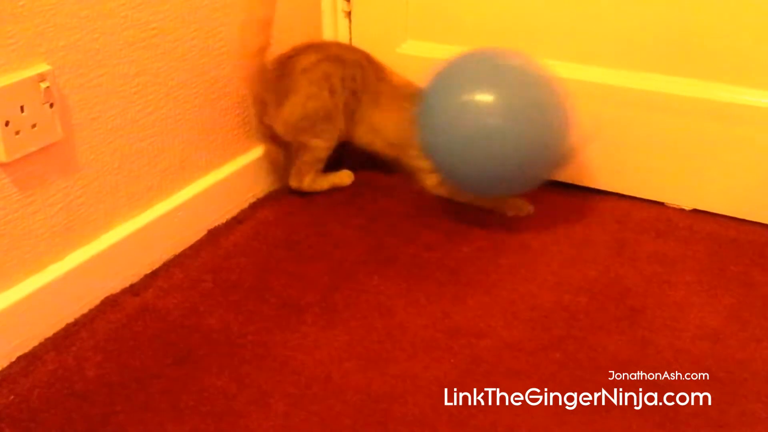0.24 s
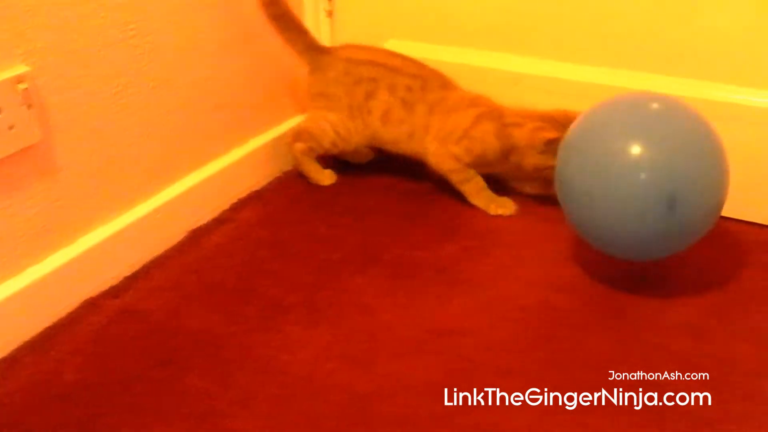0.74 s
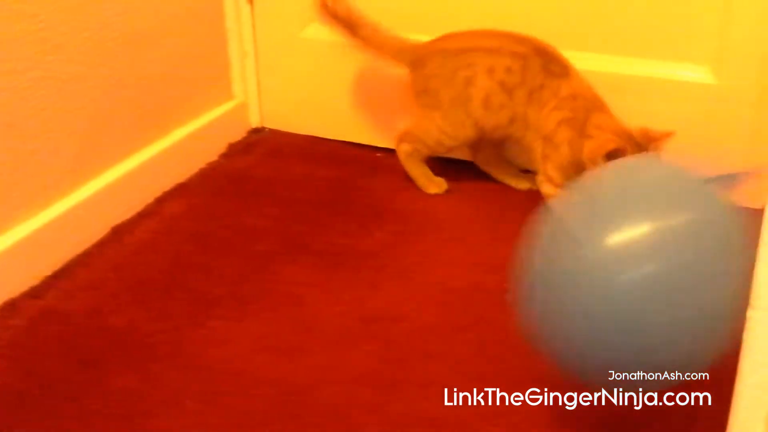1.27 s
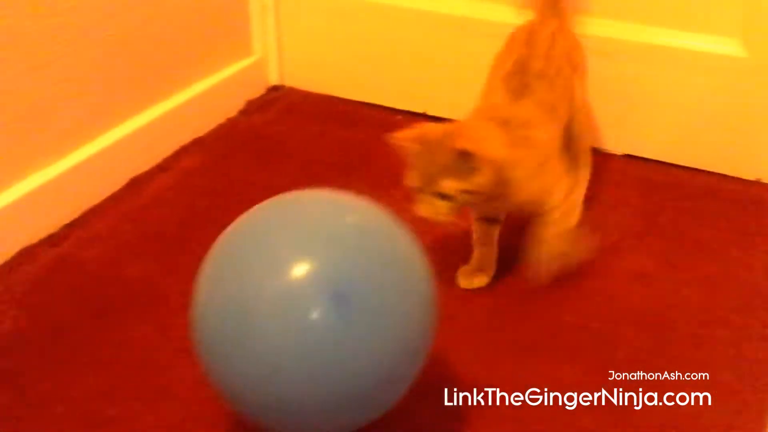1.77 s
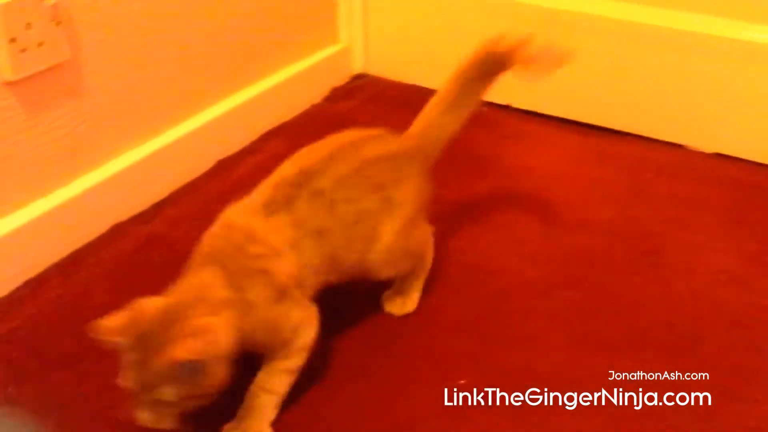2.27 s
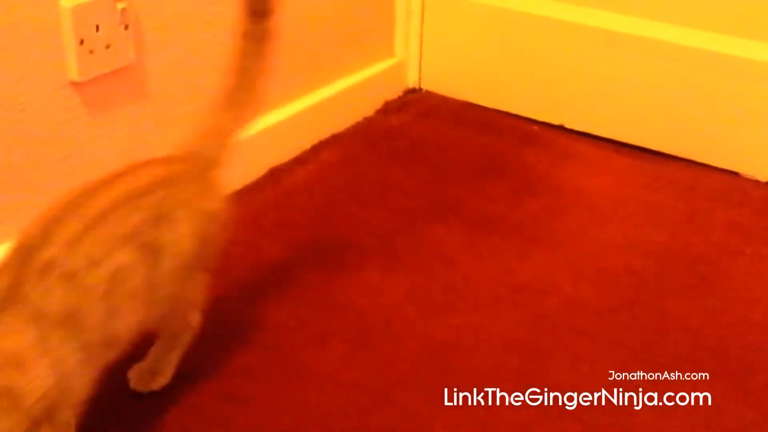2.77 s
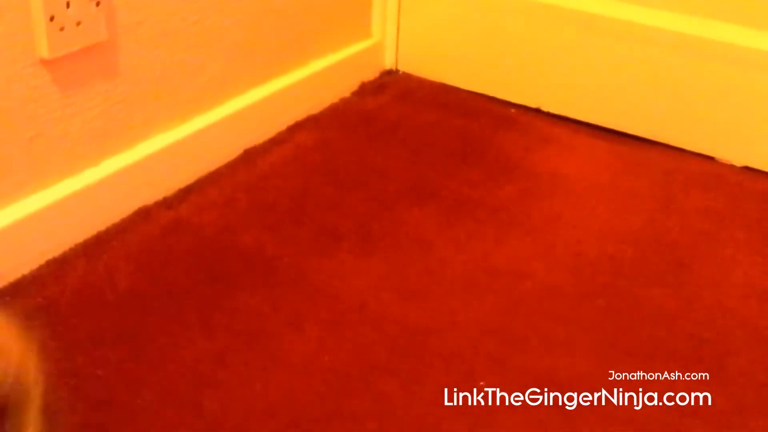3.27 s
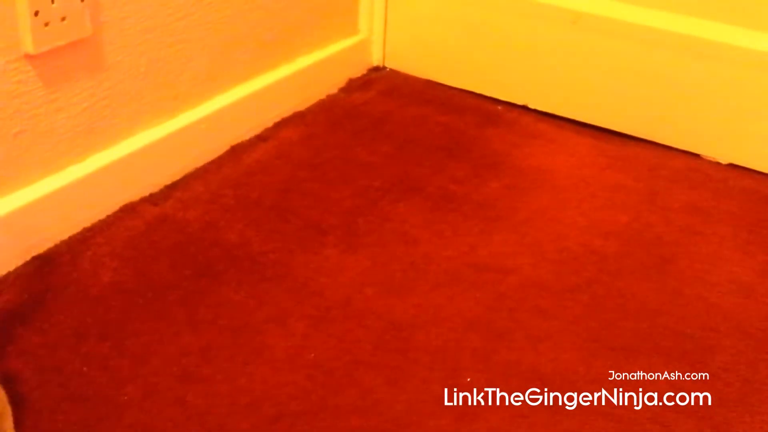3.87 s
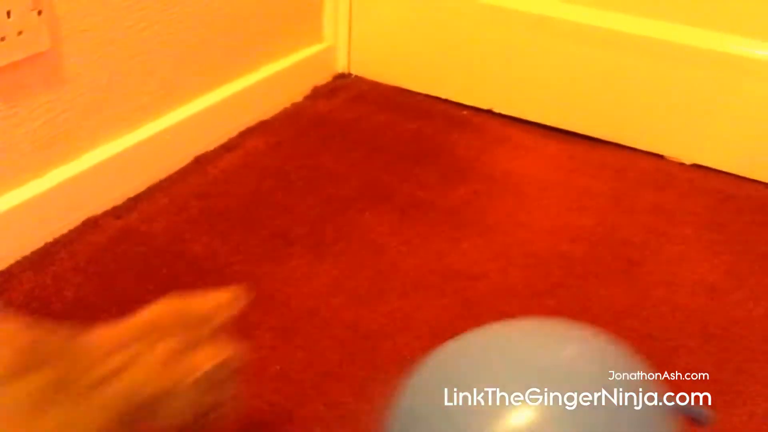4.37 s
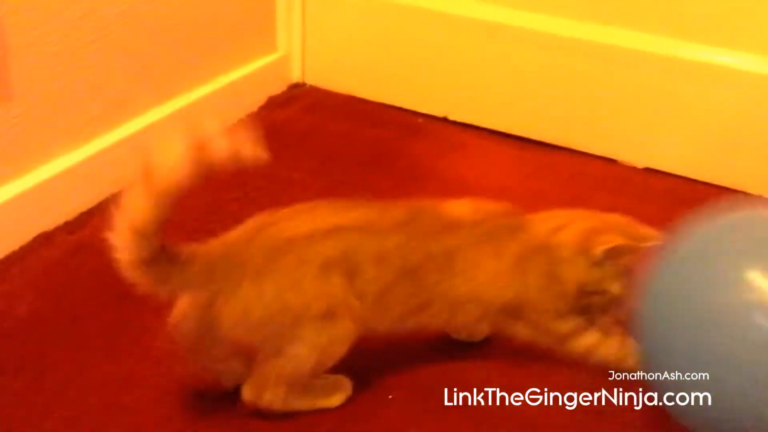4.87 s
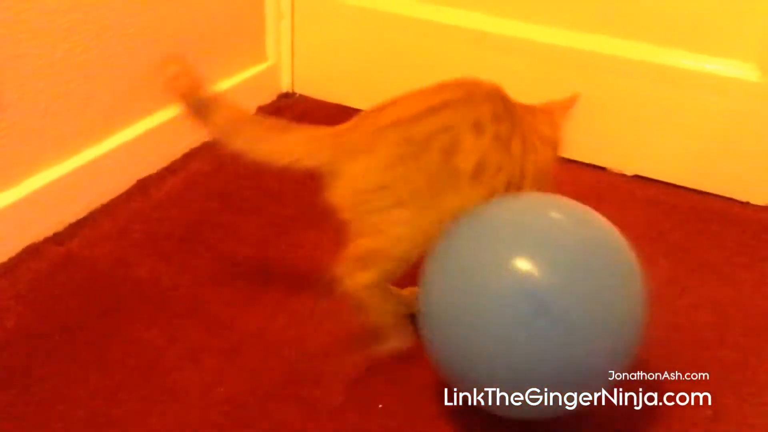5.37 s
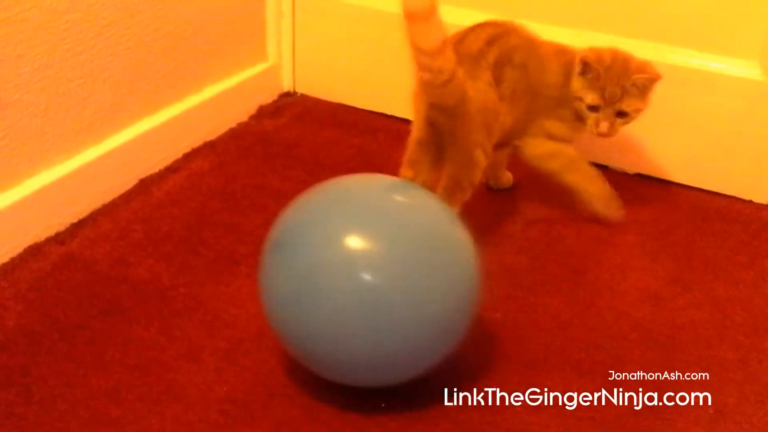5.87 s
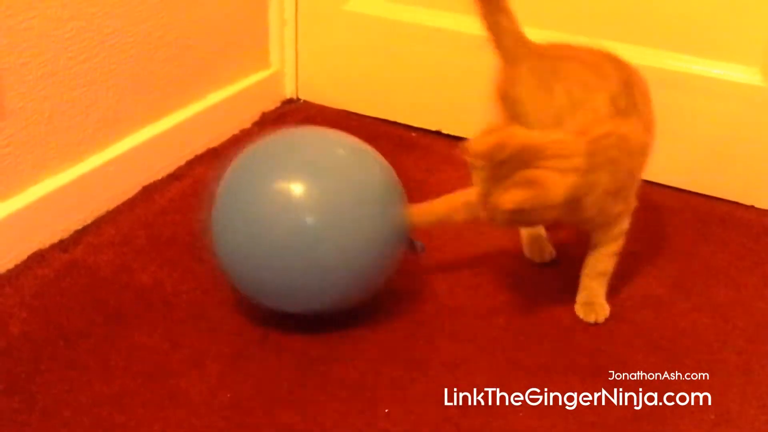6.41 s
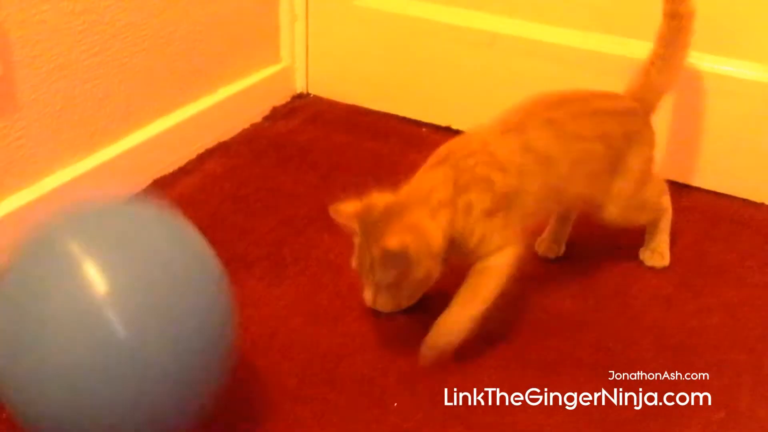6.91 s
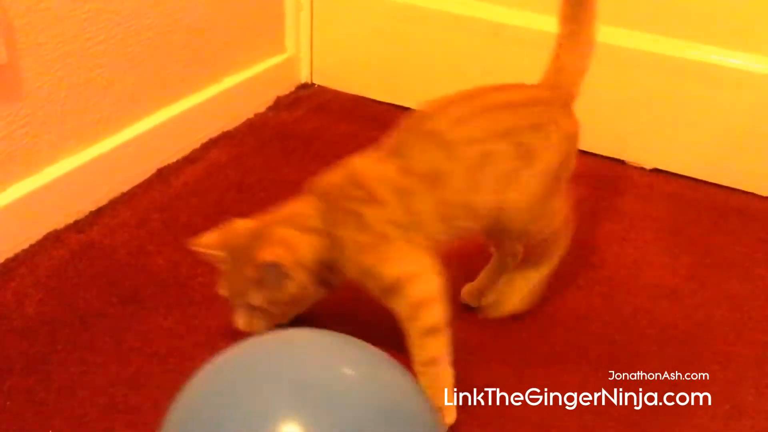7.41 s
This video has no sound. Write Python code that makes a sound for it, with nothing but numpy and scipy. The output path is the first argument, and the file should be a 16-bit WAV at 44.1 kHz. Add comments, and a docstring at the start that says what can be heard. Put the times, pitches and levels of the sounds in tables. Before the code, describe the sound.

Dull hollow balloon thumps in uneven bursts, with claw ticks, fur scuffs and rubbery drumming drags, close up in a small carpeted room.

```python
"""A small carpeted room, where a kitten chases a balloon close to a mono camera microphone.
Blows and bounces are damped thumps that excite the balloon's modes; claws and fur scuff as a tick and
grainy filtered noise; drags drum the balloon with random stick-slip taps and hiss; one slip squeaks.
The room answers with decaying noise by band, over a quiet floor of drifting noise and faint hum."""
import sys
import numpy as np
from scipy import signal
from scipy.fft import rfft, irfft, next_fast_len
from scipy.io import wavfile
from scipy.ndimage import uniform_filter1d

SR = 44100
rng = np.random.default_rng(int(sys.argv[2]) if len(sys.argv) > 2 else 0)


def master(y):
    """Save y as 16-bit WAV."""
    cut = np.clip(np.atleast_2d(y).T, -1, 1)
    pcm = np.round(cut * 32767)  # scale
    wavfile.write(sys.argv[1], SR, pcm.astype(np.int16))


N = 337365  # length in samples
GRIT_HZ, GRIT_DB = 900, 3.5  # grains of fibre hiss [1/s] and their spread [dB]


def undb(db):
    """Decibel definition: amplitude ratio of a level."""
    return 10 ** (np.asarray(db) / 20)


def unit(x):
    """Normalization to an rms of 1."""
    return x / np.sqrt(np.mean(x ** 2))


def colour(x, points):
    """Spectral shaping: filter through (frequency [Hz], gain [dB]) points."""
    size = next_fast_len(len(x))
    hz, db = np.transpose(points)
    bins_hz = np.arange(size // 2 + 1) * SR / size
    gain = undb(np.interp(np.log(bins_hz + 1), np.log(hz), db))
    return irfft(rfft(x, size) * gain, size)[:len(x)]


def fade(t, t60):
    """Exponential decay: a fall of 60 dB in t60 seconds."""
    return np.exp(-np.log(1000) * t / np.clip(t60, .01, 2))


def add(out, start_s, x):
    """Linear superposition: sum a sound into the output from its start."""
    i = int(start_s * SR)
    out[i:i + len(x)] += x[:N - i]


def walk(rate):
    """Random modulation: levels held 1 / rate seconds and slewed."""
    held = int(SR / rate)
    levels = np.repeat(rng.standard_normal(N // held + 1), held)
    return uniform_filter1d(levels, held)[:N] * 1.2


# Spectrum of the quiet background noise: (frequency [Hz], relative density [dB per Hz])
FLOOR_SPECTRUM = [(15, -50), (25, 10), (163, 1.5), (284, -3), (357, -1.5), (483, -9.5), (548, -4.5),
                  (957, -9), (4150, -16.5), (7070, -24.5), (7820, -43.5), (8880, -25.5), (10600, -32.5)]
# Narrow hums: (frequency [Hz], bandwidth [Hz], rms level [dB])
HUM_BANDS = [(200.7, 11, -60), (362, 61, -59), (553, 5.7, -62)]


def quiet(floor_db=-49.5, drift_hz=6, drift_db=0.81):
    """Stationary noise: a coloured floor drifts a little, with resonance-filtered, wavering hums."""
    floor = unit(colour(rng.standard_normal(N), FLOOR_SPECTRUM))
    out = undb(floor_db) * floor * undb(drift_db * walk(drift_hz))
    for hz, width_hz, db in HUM_BANDS:
        b, a = signal.iirpeak(hz, hz / width_hz, SR)
        out += undb(db) * unit(signal.lfilter(b, a, rng.standard_normal(N)))
    return out


# Reverberation bands: (centre [Hz], decay time t60 before the cap in room() [s], level [dB])
ROOM_BANDS = [(166, 0.59, -7), (353, 0.43, -6.5), (1030, 0.23, -6.5), (2920, 0.9, -8), (5000, 0.037, -3.5)]


def room(x, first_s=0.0109, longest_s=.45):
    """Diffuse reverberation: convolution with noise that decays separately in each band."""
    t, tail = np.arange(int(.7 * SR)) / SR, 0
    for hz, t60, db in ROOM_BANDS:
        sos = signal.butter(2, [hz / 1.6, hz * 1.6], "band", fs=SR, output="sos")
        decay = fade(t, min(t60, longest_s)) * (t > first_s)
        band = signal.sosfilt(sos, rng.standard_normal(len(t)) * decay)
        tail = tail + undb(db) * band * np.sqrt(2 * hz / SR / np.sum(band ** 2))
    return signal.fftconvolve(x, tail)[:N]


# Slipping rubber: (time [s], length [s], from [Hz], to [Hz], roughness rate [1/s], level before roughness [dB])
SQUEAK_SLIP = (4.145, .12, 1400., 2100., 1400., -52)


def squeak():
    """Frictional slip: stretched rubber sounds as a rising tone roughened into a band by random levels."""
    s, length, from_hz, to_hz, rough_hz, db = SQUEAK_SLIP
    out, t = np.zeros(N), np.arange(int(length * SR)) / SR
    cycles = from_hz * t + (to_hz - from_hz) * t ** 2 / (2 * length)
    swell = np.sin(np.pi * t / length)
    add(out, s, undb(db) * swell * np.sin(2 * np.pi * cycles) * walk(rough_hz)[:len(t)])
    return out


# Modes of the balloon: (frequency [Hz], relative level [dB], decay time t60 [s])
BALLOON_MODES = [(160.2, 0.5, 0.11), (202, -3, 0.1), (258.7, 0, 0.088), (322.2, 4.5, 0.059),
                 (438, -4, 0.065), (499, -4, 0.07), (590, -7.5, 0.054), (620, -14, 0.026),
                 (837, -17.5, 0.063), (1040, -15.5, 0.031)]


def ring(t, strength, detune):
    """Modal superposition: decaying balloon modes are summed, each with a given strength and detuning."""
    return sum(g * undb(db) * np.sin(2 * np.pi * hz * d * t) * fade(t, t60)
               for (hz, db, t60), g, d in zip(BALLOON_MODES, strength, detune))


# Spectrum of fibre hiss before its tilt: (frequency [Hz], relative density [dB per Hz])
FIBRE_SPECTRUM = [(290, -4.5), (600, -7.5), (900, -5.5), (1350, -9), (2200, -7), (6280, -17),
                  (10600, -32.5)]


def tilt(noise, db):
    """Spectral tilt: fibre hiss made brighter or duller by db per octave between 500 Hz and 8 kHz."""
    fibres = colour(noise, FIBRE_SPECTRUM)
    return unit(colour(fibres, [(500, -3 * db), (4000, 0), (8000, db)]))


# Drags of balloon and paws over fur and carpet:
# (time [s], length [s], drumming level [dB], hiss level [dB], change to the end [dB])
RUB_DRAGS = [(0.076, 0.21, -51.5, -56.5, -4.5), (0.281, 0.11, -45, -63, 5), (0.327, 0.11, -46, -40, -7),
             (1.051, 0.045, -41.5, -55, 21.5), (1.085, 0.14, -39, -44, -19), (1.305, 0.034, -35, -48, -13),
             (1.993, 0.062, -44.5, -60, 11.5), (2.085, 0.46, -35, -45.5, -21.5),
             (3.174, 0.073, -31.5, -49.5, 7.5), (3.248, 0.057, -32, -63, -28), (3.628, 0.035, -69, -49, -3),
             (4.118, 0.18, -46.5, -58, 0.5), (4.613, 0.17, -72, -46.5, -19), (4.817, 0.19, -49.5, -59, 6),
             (4.925, 0.11, -42, -56, 0), (5.008, 0.24, -37, -52, -21.5), (5.707, 0.09, -42.5, -54, -11),
             (6.142, 0.089, -74, -55.5, 1.5), (6.582, 0.11, -35.5, -39, -14.5),
             (6.753, 0.2, -33, -64, -26.5), (7.104, 0.078, -54, -47, -17)]


def rubs(slips_hz=1434.0, slip_db=2.5, edge_s=0.0089, bright_db=0.74):
    """Stick-slip friction: uneven random taps drum the balloon's modes while fur and carpet hiss."""
    drum, hiss, t = np.zeros(N), np.zeros(N), np.arange(SR // 2) / SR
    for s, length, drum_db, hiss_db, change_db in RUB_DRAGS:
        edges = np.clip(np.minimum(t, length - t) / edge_s, 0, 1)
        shape = edges * undb(change_db * np.minimum(t / length, 1))
        add(drum, s, undb(drum_db) * shape)
        add(hiss, s, undb(hiss_db) * shape * tilt(rng.standard_normal(len(t)), bright_db))
    slips = rng.random(N) < slips_hz / SR
    slips = slips * undb(slip_db * rng.exponential(size=N)) * rng.choice([-1, 1], N)
    body = ring(t, np.ones(len(BALLOON_MODES)), np.ones(len(BALLOON_MODES)))
    loud = np.sqrt(np.mean(slips ** 2) * np.sum(body ** 2))  # expected rms of steady drumming
    drumming = signal.fftconvolve(slips * drum, body)[:N] / loud
    return drumming + hiss * undb(GRIT_DB * walk(GRIT_HZ))


# Claws and fur brushing skin or carpet: (time [s], nominal level shared by tick and hiss [dB],
# brightness [dB per octave], balance of claw tick over hiss, before the tick is doubled [dB])
SCUFF_STROKES = [(0.103, -32, -5, -22), (.289, -38, 5.5, -8), (.687, -37.5, 6, -5),
                 (1.038, -16.5, -3.5, 3.5), (1.091, -22.5, -4, -8), (1.144, -22, -3.5, -4),
                 (1.303, -40.5, 3, 11), (1.326, -41, 1, 1), (1.439, -37, -5, 9), (1.611, -31, 2, -6),
                 (1.6245, -19, -3, 12), (1.658, -19.5, -2, 3), (1.667, -19, -3.5, 9),
                 (2.015, -33.5, -4, 15), (2.053, -26, -1.5, -14), (2.07, -14.5, -8.5, 6),
                 (2.126, -21.5, -2.5, -11), (2.498, -35, 4, -15), (2.836, -38.5, 4, -7),
                 (2.988, -29.5, -7.5, -20), (3.063, -32, 10.5, 8), (3.177, -34, 8, 2),
                 (3.211, -28, -1.5, -3), (3.235, -29, 6.5, 6), (3.527, -35.5, 1.5, -19),
                 (3.6503, -28.5, -2.5, 7), (3.749, -31.5, 5.5, 10), (4.086, -38, -20, 1),
                 (4.109, -29.5, -4.5, 14), (4.241, -28, 5.5, 9.5), (4.828, -43, 3, 5),
                 (4.914, -26.5, -2, -11), (5.006, -25.5, 0, 1), (5.014, -28, -2, 8),
                 (5.111, -39.5, 1.5, -8), (5.428, -36, 2.5, -16), (5.88, -42.5, 9, -6), (5.998, -44, 8, -1),
                 (6.559, -23, -2, -5), (6.578, -20.5, 3, 13), (6.76, -23.5, -2, 1), (7.1, -41, 8, -11),
                 (7.454, -40.5, 8.5, -4)]


def scuffs(rise_s=.0004, tick_s=.0014, brush_s=.003, thin_hz=900, t60_s=0.19):
    """Impulsive contact and friction: a claw catches with a thin tick, then fibres hiss in grains and settle."""
    hiss, ticks, t = np.zeros(N), np.zeros(N), np.arange(SR // 2) / SR
    catch = np.exp(-t / tick_s) * (1 - np.exp(-t / rise_s))
    settle = fade(t, t60_s) * (1 - np.exp(-t / brush_s))
    b, a = signal.butter(1, thin_hz, "high", fs=SR)
    for s, db, tilt_db, tick_db in SCUFF_STROKES:
        fibres = tilt(rng.standard_normal(len(t)), tilt_db)
        gain = undb(db) / (1 + undb(tick_db)) / 2
        tick = catch * signal.lfilter(b, a, fibres)
        tick = tick * np.sqrt(np.sum(catch ** 2) / np.sum(tick ** 2))  # energy of the catch envelope
        add(ticks, s - rise_s, gain * undb(tick_db) * 2 * tick)
        add(hiss, s - rise_s, gain * settle * fibres)
    return ticks + hiss * undb(GRIT_DB * walk(GRIT_HZ))


# Blows and bounces: (time [s], thump envelope peak [dB], settled thump pitch [Hz],
# thump swell before limits [s]: short for a paw blow, long for a free bounce)
THUD_BLOWS = [(0.113, -36, 126, 0.0078), (0.292, -36, 264, 0.0052), (.437, -21.5, 158, 0.0046),
              (0.505, -29.5, 156, 0.0053), (0.566, -35.5, 169, 0.013), (0.691, -18, 212, 0.011),
              (0.769, -35.5, 209, 0.014), (1.037, -30.5, 175, 0.0045), (1.0879, -18.5, 420, 0.0015),
              (1.107, -19, 422, 0.0034), (1.31, -16.5, 178, 0.0046), (1.326, -32.5, 558, 0.012),
              (1.618, -17.5, 180.7, 0.011), (1.809, -32.5, 157, 0.0029), (2.016, -32, 331, 0.0079),
              (2.067, -20, 322.5, 0.021), (2.071, -25, 556, 0.019), (2.13, -25.5, 443, 0.012),
              (2.145, -13, 101, 0.0016), (2.392, -18.5, 105, 0.0017), (2.415, -17, 116, 0.0023),
              (2.507, -22.5, 228, 0.0056), (2.834, -34.5, 190, 0.011), (2.965, -28.5, 160, 0.005),
              (3.065, -31, 187, 0.0081), (3.18, -31.5, 407, 0.0016), (3.197, -25, 109, 0.0081),
              (3.2365, -8.5, 235, 0.003), (3.251, -16, 246, 0.003), (3.525, -26.5, 306, 0.0017),
              (3.536, -27, 290, 0.0048), (3.755, -27.5, 150, 0.0053), (4.084, -29, 388, 0.0014),
              (4.103, -23.5, 168, 0.0093), (4.109, -31, 559, 0.0049), (4.245, -21.5, 141, 0.0029),
              (4.629, -32, 160, 0.0067), (4.83, -30.5, 99, 0.0061), (4.921, -24, 173, 0.0029),
              (5.007, -25, 543, 0.0017), (5.015, -24, 170, 0.0083), (5.027, -23.5, 524, 0.0059),
              (5.427, -25.5, 195, 0.0076), (6.56, -22.5, 199, 0.0089), (6.579, -26, 504, 0.005),
              (6.58, -32, 1218, 0.01), (6.768, -13, 170, 0.0058), (6.792, -35, 537, 0.012),
              (7.1, -29.5, 174.4, 0.0092), (7.459, -24, 198, 0.013), (7.543, -38, 232, 0.009)]
# Hardness of a middling thud [dB per octave], its rise per octave of pitch, its fall per dB of strength
HARD_DB, HARD_PER_OCTAVE_DB, SOFTER_PER_DB = 3.5, 5, 0.1073
MIDDLING_HZ, MIDDLING_DB = 200, -25
SAG, SAG_S = 0.15, 0.0057  # share by which a thump starts sharp, and its relaxation time [s]


def thuds(lead_s=0.003093, ring_db=-16.5, burst_s=0.029, scatter_db=-0.5):
    """Impact excitation: a soft push dies within a few cycles; a harder blow wakes higher modes."""
    out, t = np.zeros(N), np.arange(SR // 2) / SR
    mode_hz = np.array(BALLOON_MODES)[:, 0]
    octaves = np.minimum(np.log2(mode_hz / mode_hz[0]), 2)
    chance = rng.standard_normal((len(THUD_BLOWS), 2, len(BALLOON_MODES)))
    # the pitch sags as the squeezed skin relaxes
    sagging_t = t + SAG * SAG_S * (1 - np.exp(-t / SAG_S))
    for (s, db, hz, swell_s), (scatter, detune) in zip(THUD_BLOWS, chance):
        # a tighter contact thumps higher and harder; a heavy one lands broad and soft
        hard_db = HARD_DB + HARD_PER_OCTAVE_DB * np.log2(hz / MIDDLING_HZ)
        hard_db -= SOFTER_PER_DB * (db - MIDDLING_DB)
        push = t / np.clip(swell_s, .002, .05)
        thump = np.sin(2 * np.pi * hz * sagging_t) * (push * np.exp(1 - push)) ** 2
        strength = undb(ring_db + hard_db * octaves + scatter_db * scatter)
        skin = ring(t, strength, 1 + 0.043 * detune)
        # a short decaying noise burst feeds the modes, so the ring sounds rough
        burst = rng.standard_normal(len(t)) * np.exp(-t / burst_s)
        burst = burst / np.sqrt(np.sum(burst ** 2))
        skin = signal.fftconvolve(skin, burst)[:len(t)]
        add(out, s - lead_s, undb(db) * (thump + skin))
    return out


def scene():
    """Superposition: the play, its reverberation and the quiet floor, equal in both channels."""
    play = thuds() + scuffs() + rubs() + squeak()
    return np.tile(play + room(play) + quiet(), (2, 1))


def record(dry, bass_hz=95., top_hz=10500):
    """Band limiting: the camera drops deep bass and steeply cuts the top."""
    dry = signal.sosfilt(signal.butter(2, bass_hz, "high", fs=SR, output="sos"), dry)
    return signal.sosfilt(signal.ellip(12, .2, 100, top_hz, fs=SR, output="sos"), dry)


dry = scene()
out = record(dry)
master(out)
```